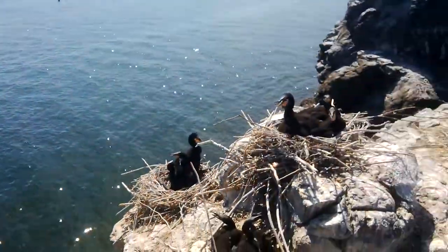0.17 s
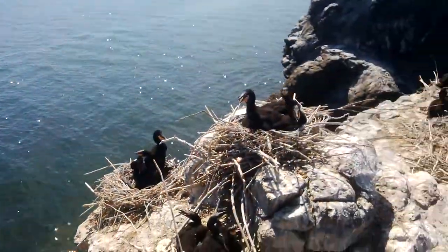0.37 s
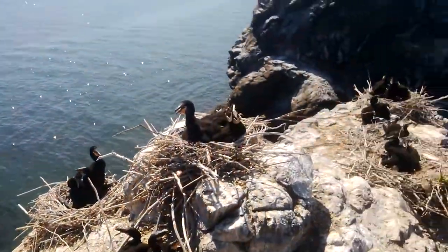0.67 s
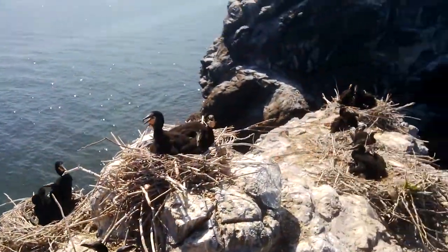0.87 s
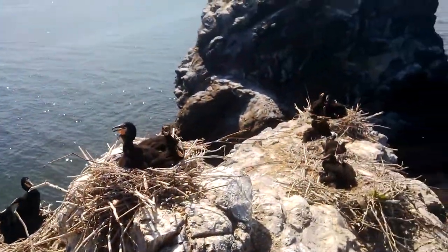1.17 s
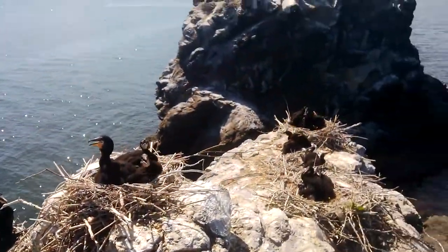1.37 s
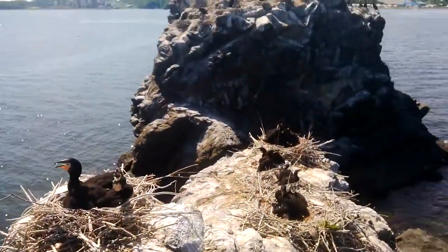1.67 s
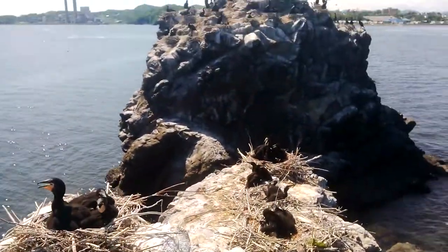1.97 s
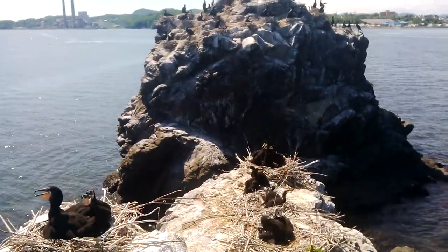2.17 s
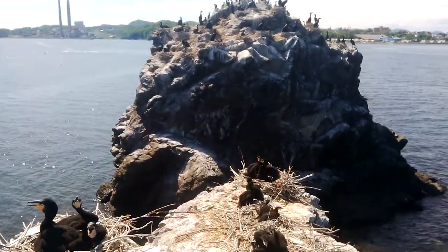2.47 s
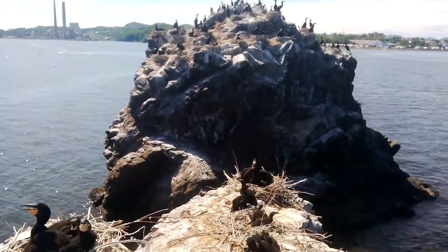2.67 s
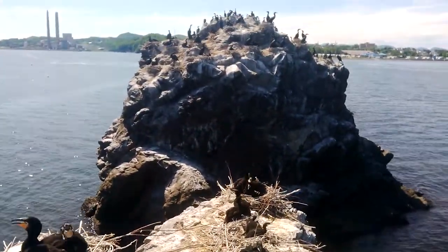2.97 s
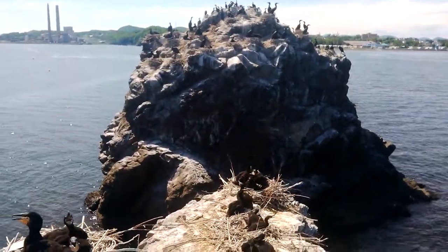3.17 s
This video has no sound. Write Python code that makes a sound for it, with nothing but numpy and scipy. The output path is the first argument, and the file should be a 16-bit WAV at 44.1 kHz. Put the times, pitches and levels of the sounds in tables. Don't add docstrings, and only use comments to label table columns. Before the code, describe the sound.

Seabird colony clamour: clear repeated chick whistles, hoarse answers, peeps and squeaks over faint sea wash

```python
import sys
import numpy as np
from scipy import signal
from scipy.fft import rfft, irfft
from scipy.io import wavfile
from scipy.ndimage import uniform_filter1d

SR = 44100
rng = np.random.default_rng(int(sys.argv[2]) if len(sys.argv) > 2 else 0)


def convert_level_to_amplitude(level_db):
    exponent = np.asarray(level_db, float) / 20
    return 10 ** exponent


def unload_wav(signal):
    wavfile.write(
        sys.argv[1],
        SR,
        np.round(np.clip(np.atleast_2d(signal).T, -1, 1) * 32767).astype(np.int16),
    )


N = 146853
T = np.arange(N) / SR
AXIS = np.fft.rfftfreq(N, 1 / SR)


def colour(table, hz):
    table_hz, level_db = np.array(table, float).T
    return np.interp(np.log(np.maximum(hz, 1)), np.log(table_hz), level_db)


def unit(x):
    return x / np.sqrt(np.mean(x ** 2) + 1e-18)


def walk(rate_hz, n):
    k = max(int(SR / rate_hz), 2)
    wander = rng.standard_normal(n + 4 * k)
    for size in (k, k, k // 2 + 1):
        wander = uniform_filter1d(wander, size)
    return unit(wander[2 * k:2 * k + n])


def patchy(table, swell_db, flicker_db, flicker_hz):
    noise = rfft(rng.standard_normal(N)) * convert_level_to_amplitude(colour(table, AXIS))
    place = 2 * np.log2(np.maximum(AXIS, 1) / 20)
    total = np.zeros(N)
    for k in range(int(2 * np.log2(table[0][0] / 20)), 20):
        band = irfft(noise * np.clip(1 - abs(place - k), 0, 1), N)
        total += band * convert_level_to_amplitude(swell_db + flicker_db * walk(flicker_hz, N))
    return unit(total)


# pitch_hz, level_db
THROAT = [(3300, 0), (4300, -3), (5200, -4), (6500, -4), (9500, -15), (12500, -30)]
# pitch_hz, density_db (per Hz)
AIR = [(2000, 7.5), (3000, -13), (6500, -6), (9500, -9), (15500, -25.5)]
BREATH_AXIS = np.fft.rfftfreq(2 * N, 1 / SR)
BREATH = irfft(rfft(rng.standard_normal(2 * N)) * convert_level_to_amplitude(colour(AIR, BREATH_AXIS)) * (BREATH_AXIS > 1800))


def voice(out, rows, rough, tint=(0, 0), count=9, breath_db=0):
    s, hz, low_db, over_db = np.array(rows, float).T
    i = int(max(s[0], 0) * SR)
    t = np.arange(i, min(int(s[-1] * SR), N)) / SR
    n, rough = len(t), np.clip(rough, 0, 1)

    def smooth(values):
        return uniform_filter1d(np.interp(t, s, values), size=520, mode="nearest")

    waver = 1 + 0.006422 * (0.1977 + 3 * rough) * walk(87.85, n)
    f = uniform_filter1d(smooth(hz), size=n // 12, mode="nearest") * waver
    phase = 2 * np.pi * np.cumsum(f) / SR
    low, over = smooth(low_db), smooth(over_db)
    y = np.zeros(n)
    for k in range(1, count + 1):
        level_db = low if k == 1 else over
        if k > 2:
            tint_db = tint[k - 3] if k in (3, 4) else -5 * (k == 5)
            fade_db = 3 * np.sqrt(k / 3) * walk(30, n)
            level_db = over + colour(THROAT, k * f) + tint_db + fade_db - k / 2
        gain = convert_level_to_amplitude(level_db) * (k * f < .36 * SR)
        flutter_hz = 260 * k ** .75
        a, b = walk(flutter_hz, n), walk(flutter_hz, n)
        steady = np.sqrt(2 - 2 * rough) + np.sqrt(rough) * a
        y += gain * (steady * np.sin(k * phase) + np.sqrt(rough) * b * np.cos(k * phase))
    edge_s = np.minimum(t - t[0], t[-1] - t)
    air = unit(BREATH[rng.integers(N):][:n])
    air_db = over - 18 + breath_db + 19 * rough + 4.5 * walk(60, n)
    y += air * convert_level_to_amplitude(air_db) * np.clip(edge_s / .03, 0, 1)
    out[i:i + n] += y * np.clip(edge_s / .002, 0, 1)


def glide(start_s, length_s, first_hz, last_hz, level_db, shape, over_db):
    rows = []
    for u, lift_db in shape:
        low_db = level_db + lift_db
        rows.append((start_s + u * length_s, first_hz + u * (last_hz - first_hz), low_db, low_db + over_db))
    return rows


# time_s, pitch_hz, fundamental_db, overtones_db
LEAD_IN = [(0.236, 1592, -34, -55), (0.278, 1680, -37.5, -45.5), (.31, 1676, -36, -41.5),
           (.345, 1774, -38, -49.5), (0.374, 1734, -37.5, -38), (.397, 1830, -44, -44),
           (.412, 1681, -35, -37.5)]
CLEAR_1 = [(.402, 1722, -27.5, -51), (0.419, 1645, -24.5, -33), (0.47, 1572, -19, -29),
           (0.552, 1625, -24, -32.5), (.595, 2254, -115, -51.5), (0.634, 1662, -16, -38),
           (0.661, 1440, -29, -55.5)]
CLEAR_2 = [(.9, 1742, -40, -42), (.95, 1749, -26, -39.5), (1.001, 1795, -36.5, -39.5),
           (1.04, 1652, -22.5, -40), (1.12, 1672, -22.5, -35), (1.165, 1722, -43, -42),
           (1.202, 1702, -23.5, -46.5), (1.235, 1565, -36.5, -75)]
CLEAR_3 = [(1.51, 1637, -27, -46.5), (1.542, 1735, -40, -42.5), (1.638, 1696, -30, -41.5),
           (1.702, 1589, -23.5, -38.5), (1.774, 1642, -21.5, -40), (1.8, 1685, -31, -44),
           (1.896, 1730, -45, -36)]
CLEAR_4 = [(2.278, 1684, -27.5, -43.5), (2.35, 1727, -21.5, -80), (2.416, 1655, -27.5, -41.5),
           (2.494, 1687, -19.5, -33.5), (2.545, 1705, -34.5, -35.5), (2.57, 1690, -21.5, -28.5),
           (2.638, 1373, -38.5, -65)]
CLEAR_5 = [(2.881, 1554, -35, -49), (2.986, 1636, -30.5, -37.5), (3.026, 1527, -33.5, -31),
           (3.051, 1657, -26, -42), (3.088, 1560, -25.5, -33.5), (3.11, 1592, -43.5, -30.5),
           (3.129, 1576, -21, -41.5), (3.17, 1663, -25, -30), (3.245, 1652, -26.5, -34.5)]
# third_harmonic_db, fourth_harmonic_db
TINTS = [(4, 10), (-8, 6), (6, -2), (2, -6), (-3, 0), (-6, 4)]


def clear_chick(out):
    for call, tint in zip((LEAD_IN, CLEAR_1, CLEAR_2, CLEAR_3, CLEAR_4, CLEAR_5), TINTS):
        voice(out, call, .02, tint)


# time_s, pitch_hz, fundamental_db, overtones_db
HOARSE = [
    [(.405, 1100, -27, -36), (.464, 1429, -22.5, -31.5), (.555, 1313, -33, -37)],
    [(.7, 1400, -37, -45.5), (.79, 1379, -24.5, -48), (.845, 1235, -26, -61)],
    [(.865, 1209, -19.5, -35.5), (.9, 1391, -23, -31.5), (.98, 1222, -29.5, -43.5)],
    [(1.78, 1366, -72.5, -46.5), (1.92, 1369, -49, -29.5), (2.0, 1235, -35, -37)],
    [(2.43, 1372, -49.5, -36.5), (2.56, 1380, -40, -35.5), (2.62, 1156, -33.5, -52)],
    [(2.692, 1290, -27, -46.5), (2.78, 1345, -24.5, -47), (2.835, 1286, -30.5, -66)],
    [(3.085, 1392, -56.5, -38), (3.15, 1377, -52, -41), (3.183, 1272, -50, -36)],
]
HOARSE_ROUGH = [.45, .4, .6, .25, .35, .55, .03]


def hoarse_chick(out):
    for call, rough in zip(HOARSE, HOARSE_ROUGH):
        voice(out, call, rough)


# start_s, length_s, first_hz, last_hz, level_db
PEEPS = [(.003, 0.014, 1890, 1747, -28.5), (.122, 0.0686, 1139, 1305, -33.5),
         (0.201, 0.0887, 1880, 1692, -33), (0.332, 0.016, 1455, 1187, -29),
         (0.686, 0.0258, 2445, 2291, -38), (1.363, 0.01646, 1676, 1215, -25.5),
         (1.398, 0.0585, 1880, 1749, -31.5), (1.508, 0.1413, 2108, 2386, -39),
         (1.751, 0.0314, 1377, 1484, -23), (1.909, 0.0293, 1663, 1543, -29.5),
         (2.068, 0.0794, 1282, 1358, -34.5), (2.23, 0.0476, 1509, 1559, -23.5),
         (2.361, 0.04825, 1456, 1505, -21), (2.616, 0.0237, 2181, 1388, -33),
         (3.151, 0.0159, 1435, 1441, -24.5)]


def peeping_neighbours(out):
    for peep in PEEPS:
        rows = glide(*peep, [(0, 2.01), (.6, 6.87), (1, 6.6)], over_db=-20)
        voice(out, rows, .07, tint=(-5, -4), count=6)


# start_s, length_s, first_hz, last_hz, level_db, roughness (0-1)
SQUEAKS = [
    (0.177, 0.0417, 2380, 2266, -45.5, 0.14),
    (0.319, 0.0297, 2676, 2720, -45, 0.2),
    (0.375, 0.0306, 3000, 2715, -48, 0.1),
    (1.665, 0.251, 2439, 2531, -47.5, 0.61),
    (2.852, 0.022, 2436, 2883, -44.5, 0.12),
    (2.9, 0.0397, 2750, 2564, -41.5, 0.31),
    (2.959, 0.0135, 2606, 2430, -41.5, 0),
    (3.002, 0.055, 2463, 2655, -41, 0.65),
    (3.069, 0.0306, 2650, 2356, -44, 0),
]


def tiny_chick(out):
    for s, length, first_hz, last_hz, db, rough in SQUEAKS:
        rows = glide(s, length, first_hz, last_hz, db + 4, [(0, -6), (.4, 3.5), (1, -4)], over_db=-4)
        voice(out, rows, rough, tint=(9, 9), count=4, breath_db=-4)


# time_s, pitch_hz, level_db
SQUEAL = [
    (2.226, 5306, -39),
    (2.282, 5257, -43.5),
    (2.367, 4510, -33.5),
    (2.428, 4860, -39.5),
]


def squeal():
    s, hz, db = np.array(SQUEAL).T
    phase = 2 * np.pi * np.cumsum(np.interp(T, s, hz)) / SR
    torn = (0.83 + walk(323, N)) * np.sin(phase) + 0.76 * walk(290, N) * np.cos(phase)
    return torn * convert_level_to_amplitude(np.interp(T, s, db, -120, -120) - 3.0)


# start_s, length_s, first_hz, last_hz, level_db
NESTS = [(0.026, 0.024, 1389, 1472, -37), (0.029, 0.125, 2250, 1900, -40.5),
         (0.015, 0.1004, 1053, 988.6, -43), (0.141, 0.0326, 2458, 2313, -32),
         (0.233, 0.0502, 1379, 1163, -33.5), (0.291, 0.03, 1357, 1387, -40),
         (0.558, 0.0513, 2622, 2523, -40.5), (0.775, 0.051, 2183, 2223, -39),
         (0.824, 0.0294, 2110, 2298, -41.5), (1.244, 0.0355, 1486, 1603, -32.5),
         (1.365, 0.0407, 1894, 1665, -34), (1.422, 0.0686, 1364, 1239, -40),
         (1.499, 0.0377, 753, 1125, -52.5), (1.987, 0.064, 1597, 1604, -41.5),
         (2.047, 0.057, 1792, 1711, -36.5), (2.107, 0.0557, 1441, 1292, -39.5),
         (2.142, 0.092, 2200, 2080, -42.5), (2.189, 0.089, 1850, 1955, -39.5),
         (2.216, 0.045, 2320, 2556, -40.5), (2.863, 0.049, 1257, 1471, -37.5),
         (2.965, 0.057, 844, 1004, -45), (3.184, 0.0182, 1053, 995, -39.5), (3.24, 0.0352, 953.4, 821, -42),
         (3.26, .06, 1500, 1400, -38), (3.306, 0.0245, 2804, 2615, -45)]


def nearby_nests(out):
    for call in NESTS:
        voice(out, glide(*call, [(0, 1), (.4, 6), (1, 2)], over_db=-19), .2, count=5)


# time_s, calls_db, rasp_db
CROWD = [(0, -29, -38.5), (.52, -32, -41), (.62, -32, -56), (0.748, -34, -37), (1.36, -31.5, -39.5),
         (1.47, -31, -49), (1.54, -34, -34.5), (1.97, -34, -45), (2.02, -29, -46), (2.2, -33.5, -45.5),
         (2.25, -43, -39.5), (2.621, -33, -38), (2.66, -39, -55), (2.71, -34.5, -44), (2.829, -38, -44.5),
         (2.9, -37, -39), (3.33, -37, -39)]


def crowd():
    out = np.zeros(N)
    low_hz, high_hz = 899.65, 2271.6
    when = np.linspace(0, N / SR - .07, num=240)
    for s, (u, v, w, g, r) in zip(when, rng.random((len(when), 5))):
        hz = low_hz * (high_hz / low_hz) ** u
        length_s = .07 * (0.27 + .7 * v)
        db = 5 * (2 * g - 1) - 13 * abs(np.log2(hz / 1450))
        s = s + .03 * w
        shape = [(0, .92 + 0.1348 * w, 6.03), (.3, 1.02, 10.14), (.7, 1, 5.3), (1, 0.8 + 0.223 * r, 3)]
        rows = [(s + a * length_s, hz * b, db + c, db + c - 44.5) for a, b, c in shape]
        voice(out, rows, .08 + .4 * r, count=5)
    out = out / np.sqrt(uniform_filter1d(out ** 2, size=5000) + 1e-3)
    shrill = irfft(rfft(out) * (AXIS > 2700), N)
    shrill = shrill / np.sqrt(uniform_filter1d(shrill ** 2, size=5000) + 1e-5)
    rasp = patchy(AIR, 3 * walk(25, N), 4, 16) + .6 * shrill
    s, calls_db, rasp_db = np.array(CROWD).T
    return unit(out) * convert_level_to_amplitude(np.interp(T, s, calls_db)) + rasp * convert_level_to_amplitude(np.interp(T, s, rasp_db))


def rock_echo(birds):
    t60_s = 0.055
    lag = np.arange(int(.3 * SR)) / SR
    tail = rng.standard_normal(len(lag)) * convert_level_to_amplitude(-60 * lag / t60_s) * (lag > .004)
    return convert_level_to_amplitude(-13) * signal.fftconvolve(birds, tail / np.sqrt(np.sum(tail ** 2)))[:N]


# pitch_hz, density_db (per Hz)
SEA = [(25, -25), (75, -22.5), (129, -27.5), (450, -24), (1500, -11.5), (2800, -53.5), (6700, -59),
       (15500, -46.5)]


def sea():
    return patchy(SEA, walk(4, N), 3.8, 7) * convert_level_to_amplitude(-40.5)


# centre_s, width_s, level_db
GUSTS = [
    (.22, 0.042, -41),
    (3.3, 0.0763, -46),
]


def wind():
    rumble = rfft(rng.standard_normal(N)) * (AXIS > 12) / (1 + (AXIS / 45) ** 3)
    puff = unit(irfft(rumble, N))
    return puff * sum(convert_level_to_amplitude(db) * np.exp(-((T - s) / width) ** 2) for s, width, db in GUSTS)


# pitch_hz, level_db
HUM = [
    (79, -65),
    (173, -62.5),
    (11590, -74),
]


def hum():
    out = np.zeros(N)
    for hz, db in HUM:
        level_db = db + 2 * walk(8.9, N)
        if hz == HUM[1][0]:
            level_db = level_db - 8 * (T < 1.45)
        out += np.sqrt(2) * convert_level_to_amplitude(level_db) * np.sin(2 * np.pi * hz * T + 0.295 * walk(5.2, N))
    return out


def scene():
    birds = np.zeros(N)
    for source in (clear_chick, hoarse_chick, peeping_neighbours, tiny_chick, nearby_nests):
        source(birds)
    birds = birds + squeal() + crowd()
    return (birds + rock_echo(birds) + sea() + wind() + hum())[None]


def low_pass(x):
    return signal.sosfilt(signal.butter(12, 15630, fs=SR, output="sos"), x)


def record(dry):
    return low_pass(dry)


dry = scene()
out = record(dry)
unload_wav(out)
```